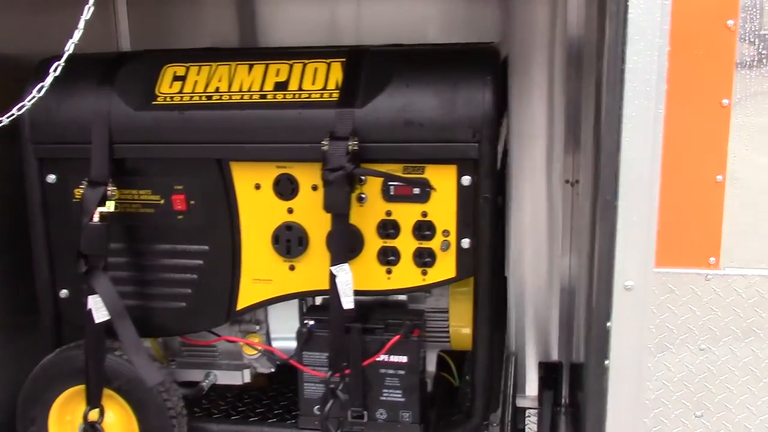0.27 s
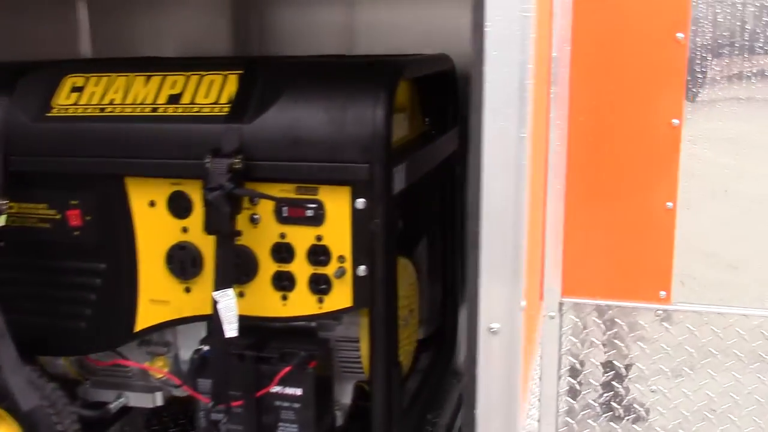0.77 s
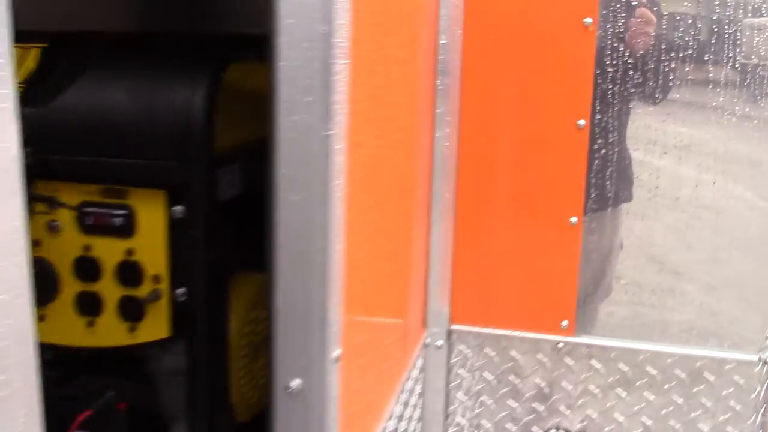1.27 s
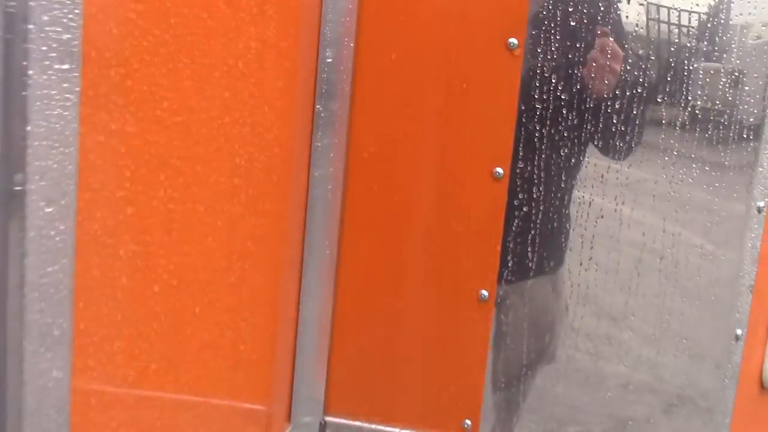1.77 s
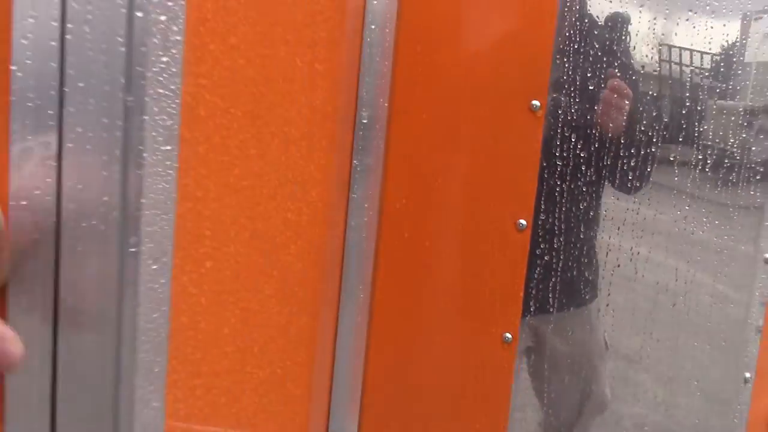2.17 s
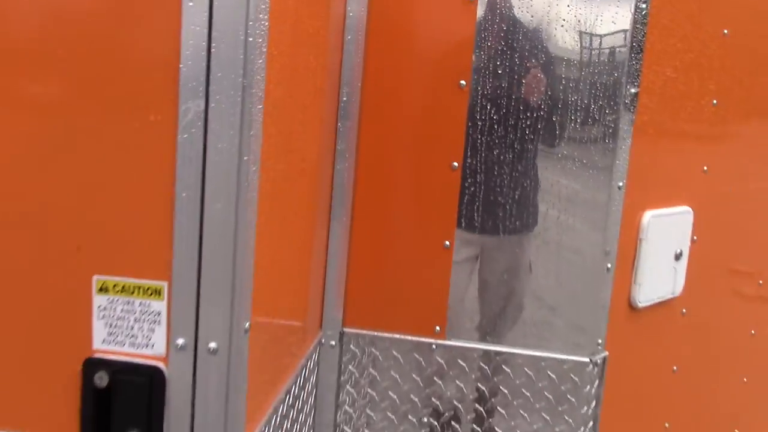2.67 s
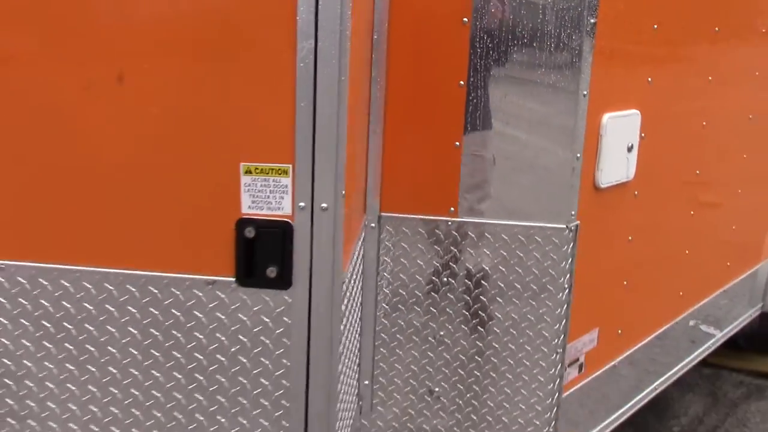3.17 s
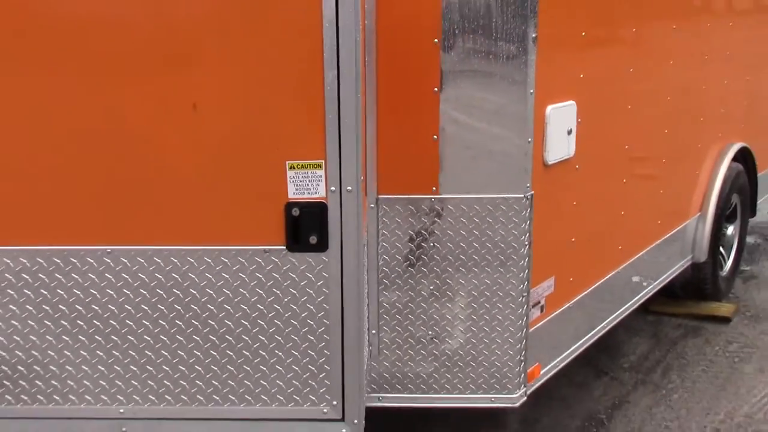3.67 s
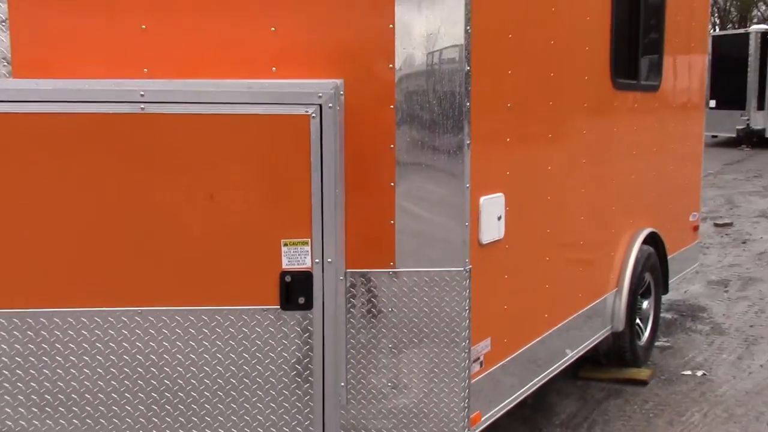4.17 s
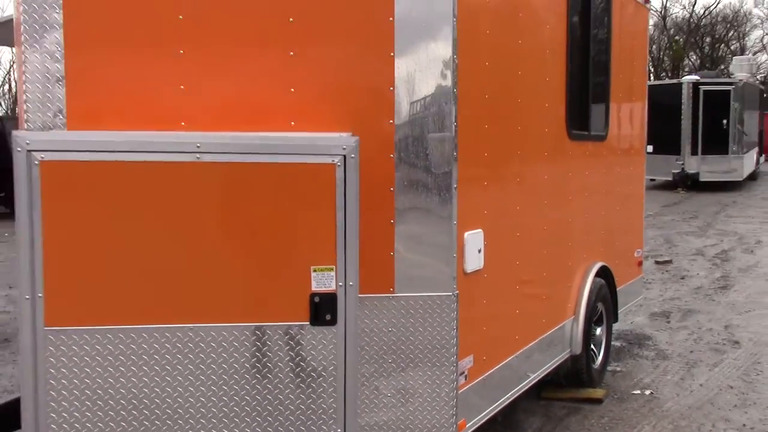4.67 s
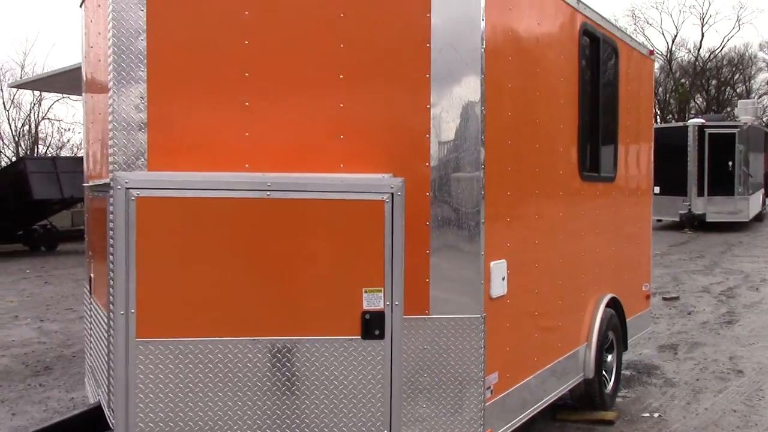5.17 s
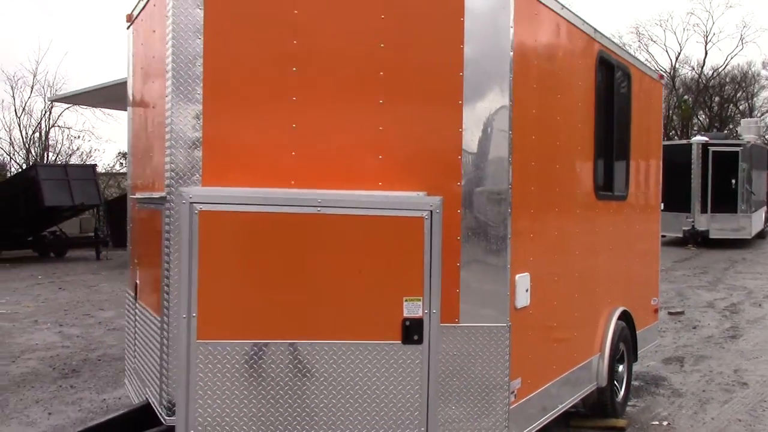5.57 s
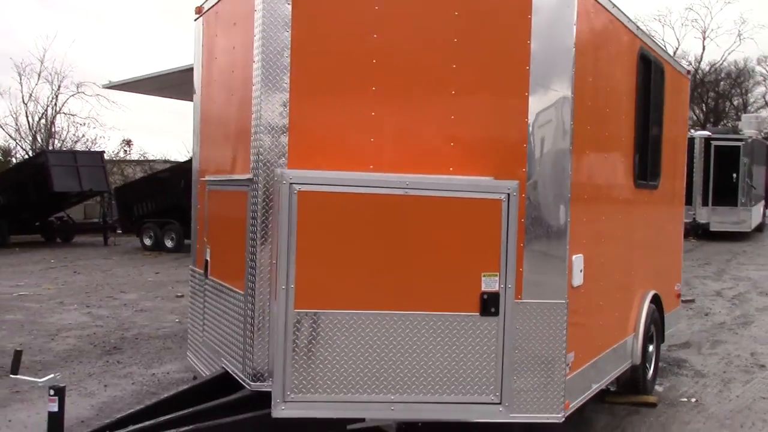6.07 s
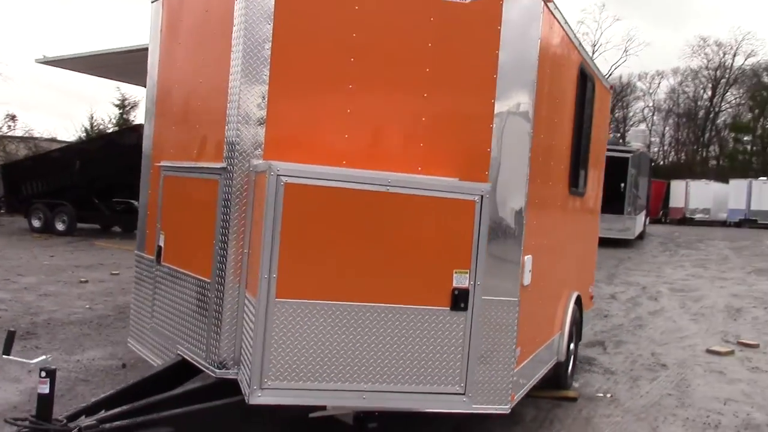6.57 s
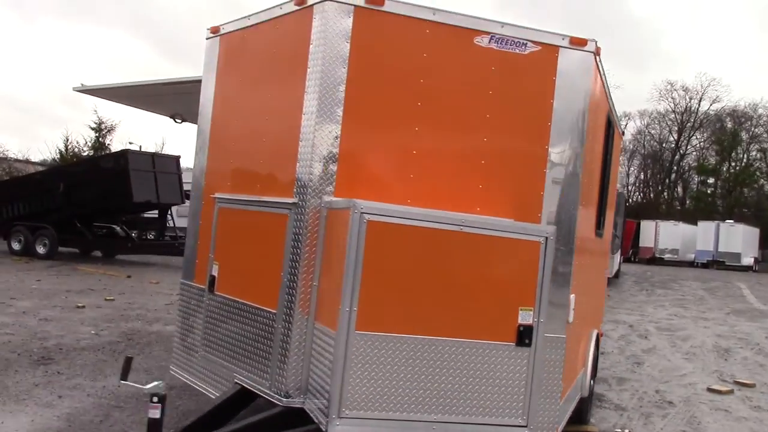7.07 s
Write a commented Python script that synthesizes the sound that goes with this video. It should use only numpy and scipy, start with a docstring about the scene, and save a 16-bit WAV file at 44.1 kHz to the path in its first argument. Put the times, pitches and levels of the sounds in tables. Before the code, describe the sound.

Small metallic clicks and gritty scuffs, then a sheet-metal door bangs shut with a boom and latch snap, and wind rumble swells outdoors.

```python
"""Slamming a sheet-metal door in a wet gravel yard

A trailer's compartment door bangs shut outdoors: struck modes ring, the panel booms, the latch snaps.
Hardware clicks and scrapes, shoes scuff over grit and something squeals faintly far off: filtered noise
bursts and wavering tones. Distant traffic is coloured noise; wind is turbulent noise that surges just after
the slam, eases, then builds to the end.
The bang turns the microphone's automatic gain down, and it stays down. Table levels precede that gain."""
import sys
import numpy as np
from scipy import signal
from scipy.fft import rfft, irfft, next_fast_len
from scipy.io import wavfile
from scipy.ndimage import uniform_filter1d

SR = 44100
rng = np.random.default_rng(int(sys.argv[2]) if len(sys.argv) > 2 else 0)


def master(y):
    """Save y as 16-bit WAV."""
    cut = np.clip(np.atleast_2d(y).T, -1, 1)
    pcm = np.round(cut * 32767)  # scale
    wavfile.write(sys.argv[1], SR, pcm.astype(np.int16))


N = 323253
T = np.arange(N) / SR  # time in seconds


def undb(db):
    """Decibel law: 20 dB is a tenfold amplitude ratio."""
    return 10 ** (np.asarray(db) / 20)


def unit(x):
    """Normalisation: scale to rms 1."""
    return x / np.sqrt(np.mean(x ** 2) + 1e-18)


def curves(rows):
    """Linear interpolation: join each column of a table by straight lines in time."""
    times, *columns = np.transpose(rows)
    return [np.interp(T, times, column) for column in columns]


def colour(x, points, tilt_db=0):
    """Spectral filtering: weight a sound by (Hz, dB) points and a tilt in dB per octave."""
    size = next_fast_len(len(x))
    octave = np.log2(np.maximum(np.fft.rfftfreq(size, 1 / SR), 1))
    hz, db = np.transpose(points)
    gain = undb(np.interp(octave, np.log2(hz), db) + tilt_db * octave)
    return irfft(rfft(x, size) * gain, size)[:len(x)]


def shape(x, points, tilt_db=0):
    """Spectral filtering followed by scaling to rms 1."""
    return unit(colour(x, points, tilt_db))


def band(x, hz, q):
    """Second-order resonance: pass one broad band; Q is held above 0.5."""
    b, a = signal.iirpeak(min(hz, SR / 3), max(q, .5 + 1e-3), fs=SR)
    return signal.lfilter(b, a, x)


def walk(rate):
    """Slow random modulation: about rate new levels per second, smoothly joined, rms 1."""
    k = max(int(SR / rate), 2)
    levels = rng.standard_normal(N // k + 2)
    joined = np.interp(np.arange(N) / k, np.arange(len(levels)), levels)
    return unit(uniform_filter1d(joined, k // 2))


def fade(t, t60):
    """Exponential decay: down 60 dB after t60 seconds."""
    return np.exp(-np.log(1000) * t / t60)


def add(out, s, x):
    """Superposition: mix x into out from time s on."""
    i = max(int(s * SR), 0)
    out[i:i + len(x)] += x[:len(out) - i]


# spectrum of distant traffic and air: frequency_hz, density_db (relative, per Hz)
YARD_SPECTRUM = [(30, 3.5), (120, 5), (200, 1.5), (350, -5), (600, -7), (850, -6), (1150, -9.5),
                 (1600, -12), (2500, -19), (4000, -24.5), (6000, -27.5), (7500, -32), (11000, -40),
                 (15500, -37)]
YARD_DB = -41


def yard(flicker_db=0.88, dip_s=1.6, dip_db=-11):
    """Diffuse noise: many distant sources blur into a wash that wavers and dips briefly just after the bang."""
    dip = dip_db * np.exp(-((T - dip_s) / .018) ** 2)
    wash = shape(rng.standard_normal(N), YARD_SPECTRUM)
    return wash * undb(YARD_DB + flicker_db * walk(5.3) + dip)


def eddies(points, even_s):
    """Turbulent pressure: coloured noise whose strength is even over spans longer than even_s."""
    x = shape(rng.standard_normal(N), points)
    return x / np.sqrt(uniform_filter1d(x ** 2, int(even_s * SR)) + 1e-9)


# spectra of wind rumble and of slow pressure swells: frequency_hz, density_db (relative, per Hz)
RUMBLE_SPECTRUM = [(12, -1), (22, 2.5), (42, -3), (60, -9.5), (105, -19.5), (140, -27), (250, -45.5),
                   (500, -58), (1200, -97)]
SWELL_SPECTRUM = [(2, -11), (6, 1), (11, 12), (17, -2.5), (28, -16), (60, -97)]
# the breeze surges just after the slam, eases, then builds to the end: time_s, rumble_db
BREEZE_LEVELS = [(0, -37.5), (1.3, -38.5), (1.9, -25.5), (2.5, -35.5), (3.2, -30.5), (3.9, -33.5),
                 (4.9, -32), (5.7, -26), (6.6, -19), (7.33, -11)]
# gusts and lulls on top of it: middle_s, half_length_s, change_db
GUST_CHANGES = [(.4, 0.35, 6), (2.274, .05, 7), (4.52, 0.029, 8), (4.69, 0.055, 4), (5.14, 0.18, 12),
                (5.343, 0.046, -7), (5.965, 0.06, 10.5), (6.326, 0.03, 1.5), (6.853, 0.035, 4),
                (6.943, 0.033, 0)]
# swell level under a full-scale rumble in dB, and dB of swell per dB of rumble
SWELL_DB, SWELL_FOLLOW = -3.5, 0.67


def wind(flutter_db=1.5, ceiling=.85):
    """Turbulence at the microphone: gusts rumble over slow swells; soft saturation flattens the strongest."""
    rumble_db = curves(BREEZE_LEVELS)[0]
    for s, half_s, db in GUST_CHANGES:
        rumble_db = rumble_db + db * np.exp(-((T - s) / half_s) ** 2)
    swell_db = SWELL_DB + SWELL_FOLLOW * rumble_db
    rumble = eddies(RUMBLE_SPECTRUM, 0.139) * undb(rumble_db + flutter_db * walk(22))
    swell = eddies(SWELL_SPECTRUM, 0.27) * undb(swell_db)
    return ceiling * np.tanh((rumble + swell) / ceiling)


# grit under a sole: frequency_hz, density_db (relative, per Hz)
GRIT_SPECTRUM = [(200, 26.5), (1000, 10.5), (2500, 6), (6000, 0.5), (7200, -2.5), (11500, -10.5),
                 (13000, -9), (16000, -30)]
# footsteps on wet grit: middle_s, half_length_s, level_db
FOOTSTEPS = [(0.185, 0.072, -49), (0.457, 0.18, -56), (1.38, 0.37, -53.5), (2.16, 0.081, -45),
             (2.429, 0.24, -54), (3.092, 0.05, -46), (3.862, 0.12, -49), (4.501, 0.15, -53),
             (5.072, 0.15, -53), (6.644, 0.053, -53), (7.141, 0.11, -54.5)]
# brief hard scrapes: middle_s, level_db, centre_hz
HARD_SCRAPES = [(0.129, -45, 9300), (.943, -33.5, 3600), (1.003, -37.5, 2500), (1.06, -37.5, 3900),
                (1.139, -34.5, 2100), (1.215, -46, 4400), (1.52, -41, 1460), (1.729, -43, 2500),
                (3.203, -36.5, 2200), (3.31, -35.5, 2960)]
STEP_HZ, SCRAPE_HALF_S = 4900, 0.018


def scuffs(q=.501, grain_db=5, lean=0.13):
    """Sliding friction: a swell of tiny cracks of unequal size that rises faster than it fades."""
    out, t = np.zeros(N), T[:SR // 2]
    steps = [(*row, STEP_HZ) for row in FOOTSTEPS]
    scrapes = [(s, SCRAPE_HALF_S, db, hz) for s, db, hz in HARD_SCRAPES]
    for s, half_s, level_db, hz in steps + scrapes:
        grit = 0
        for _ in range(3):  # three sets of stones crack independently
            sizes = undb(grain_db * np.minimum(rng.exponential(size=len(t)), 4))
            grains = sizes[np.arange(len(t)) // 48]  # one size per 48 samples
            grit = grit + unit(band(grains * rng.standard_normal(len(t)), hz, q))
        start = max(s - t[-1] / 2, 0)
        age = t + start - s
        width_s = half_s * (1 + lean * np.sign(age))
        swell = np.exp(-(age / width_s) ** 2)
        add(out, start, undb(level_db) * shape(grit, GRIT_SPECTRUM) * swell)
    return out


# something loose rattles on after the slam
RATTLE_S, RATTLE_GAP_S, RATTLE_JITTER_S = 1.912, .033, .006
RATTLE_DB, RATTLE_FALL_DB = -39.5, 1.5  # first tick, and fall per tick
RATTLE_HZ, RATTLE_Q, RATTLE_T60_S = 6000, 1.4, .06


def rattle(count=5):
    """Repeated impact losing energy: unevenly spaced ticks, each weaker, as rows of clicks."""
    rows = []
    for k, late in enumerate(rng.standard_normal(count)):
        start_s = RATTLE_S + k * RATTLE_GAP_S + RATTLE_JITTER_S * late
        rows.append((start_s, RATTLE_DB - k * RATTLE_FALL_DB, RATTLE_HZ, RATTLE_Q, RATTLE_T60_S))
    return rows


# sharp clicks of hardware and stones: start_s, level_db, centre_hz, resonance_q (each of two passes), t60_s
SHARP_CLICKS = [(.4775, -36.5, 3200, 1.16, 0.075), (.6465, -44.5, 3500, 0.68, 0.031),
                (.6996, -32, 5300, 1, .045), (.7234, -38, 5200, .9, 0.042), (.732, -35, 4530, 0.63, 0.041),
                (.8445, -39, 6130, 1, 0.036), (.9319, -33, 4580, 1.15, 0.088),
                (.9505, -28, 4100, 2.6, .024), (1.05, -45, 4000, 0.4, .05), (1.1318, -28, 2170, 3.8, 0.021),
                (2.363, -45, 4470, 1.2, .07), (2.535, -34.5, 3560, 0.97, 0.053),
                (3.2015, -32, 1900, 2.2, 0.054), (3.211, -37.5, 4440, 4.9, 0.026),
                (3.3024, -35.5, 6600, 0.75, .11), (3.404, -40, 9900, 1.4, 0.026),
                (3.523, -41.5, 6850, 1.3, 0.016), (3.915, -42.5, 4350, 1.3, .1),
                (4.5696, -42, 4500, 1, .049), (5.924, -42.5, 4200, 1.3, 0.029),
                (5.941, -37.5, 3420, 1.5, 0.023), (7.07, -42, 7300, .8, 0.11),
                (7.0975, -35, 8100, 1.3, 0.027), (7.1452, -41, 5100, 1.3, 0.079)]
# dull knocks of heels and handling: start_s, level_db, centre_hz, resonance_q (each of two passes)
DULL_KNOCKS = [(.648, -34.5, 613, 0.82), (.7278, -28.5, 560, 1.4), (3.005, -31, 332, 1.6),
               (3.31, -32, 450, 1.1), (4.384, -34, 333, 1.4), (5.9188, -20.5, 126, 4.2)]
KNOCK_T60_S = 0.044


def clicks(tail_db=-24, tail_t60=0.48):
    """Damped resonance: small contacts, bright or dull, each die fast in one band over a faint tail."""
    out, t = np.zeros(N), T[:SR // 4]
    knocks = [(*row, KNOCK_T60_S) for row in DULL_KNOCKS]
    for s, level_db, hz, q, t60 in list(SHARP_CLICKS) + knocks + rattle():
        body = band(band(rng.standard_normal(len(t)), hz, q), hz, q)
        decay = fade(t, t60) + undb(tail_db) * fade(t, tail_t60)
        # level_db is the strength at the onset, whatever the decay
        add(out, s, undb(level_db) * unit(body * decay) * np.sqrt(np.mean(decay ** 2)))
    return out


# puffs of air as the door closes and springs back: middle_s, peak_db
AIR_PUFFS = [(1.55, -18), (1.699, -8.5)]
PUFF_S = 0.014  # from the middle of a puff to its crest


def puffs():
    """Air displacement: the moving door shoves air at the microphone, a push and then a suck."""
    out = np.zeros(N)
    for s, peak_db in AIR_PUFFS:
        age = (T - s) / PUFF_S
        out -= undb(peak_db) * age * np.exp((1 - age ** 2) / 2)  # crests at 1
    return out


# blows on the door frame and latch: start_s, level_db, ringing_db (relative to the crack),
# tilt_db (per octave, of the crack), crack_t60_s
FRAME_BLOWS = [(1.5489, -7, -14.5, -0.8, 0.043), (1.6205, -31, -10, -8, .03),
               (1.6274, -23.5, -20, -2.5, 0.05), (1.7438, -22, -14, -3, 0.025),
               (1.7696, -21.5, -1, 3, 0.048), (1.7895, -33, -16, -0.5, 0.12),
               (1.821, -5.5, -1.5, 2.5, 0.029), (1.8335, -20, 0, 1.5, 0.071)]
# modes of frame and latch: frequency_hz, level_db (relative), t60_s
FRAME_RESONANCES = [(425, -20, .2), (641, -17, .12), (832, 0, .085), (913, -2, .05), (959, -2, .055),
                    (1105, -5, .05), (1230, 1, .065), (1305, -5, .06), (1445, -3, .055), (1505, -7, .09),
                    (1631, -4, .085), (1789, -2, .08), (1908, -10, .07), (2065, -4, .05), (2143, -4, .075),
                    (2305, -9, .07), (2610, -14, .06), (3035, -17, .11), (3620, -21, .08), (4130, -12, .06),
                    (4380, -9, .06), (4760, -13, .08), (5110, -16, .08), (5630, -12, .065),
                    (5980, -16, .09), (6944, -17, .06), (8333, -20, .05)]
# crack of metal on metal: frequency_hz, density_db (relative, per Hz)
CRACK_SPECTRUM = [(120, -10), (350, 3.5), (650, -4), (900, -2.5), (2100, -4.5), (2800, -8.5), (4400, -11),
                  (5700, -15), (7000, -13), (8700, -15), (10500, -27), (12500, -30), (16000, -47)]


def frame(tail_db=-27, tail_t60=0.35, rise_s=0.000076, ring_tilt=.1):
    """Modal impact: metal meets metal in a short crack, ringing modes and a thin tail from the trailer's skin."""
    out, t = np.zeros(N), T[:SR // 2]
    hz, db, t60 = np.transpose(FRAME_RESONANCES)[:, :, None]
    for s, level_db, ring_db, tilt_db, crack_t60 in FRAME_BLOWS:
        decay = fade(t, crack_t60) + undb(tail_db) * fade(t, tail_t60)
        crack = shape(rng.standard_normal(len(t)), CRACK_SPECTRUM, tilt_db) * decay
        # the modes take only a share, ring_tilt, of the crack's tilt
        weight = undb(db + ring_tilt * tilt_db * np.log2(hz))
        # each blow lands on another spot, so the modes start out of step
        modes = weight * fade(t, t60) * np.sin(2 * np.pi * (hz * t + rng.random(hz.shape)))
        ring = modes.sum(axis=0) / np.sqrt(np.sum(weight ** 2) / 2)
        onset = 1 - np.exp(-t / rise_s)
        add(out, s, undb(level_db) * (crack + undb(ring_db) * ring) * onset)
    return out


# the door lands on its seal, bounces and is pressed home: start_s, level_db, contact_s
SEAL_THUMPS = [(1.55, -11.5, 0.0022), (1.562, -2, 0.0083), (1.589, -10.5, 0.0034), (1.614, -5.5, 0.00554),
               (1.629, -12, 0.0015), (1.745, -19.5, 0.003), (1.792, -21.5, .0009), (1.839, -17, 0.0021)]
# modes of the panel and the compartment behind it: frequency_hz, level_db (relative), t60_s
PANEL_RESONANCES = [(37.9, -2, 0.24), (60.8, -5, 0.29), (93.4, -1.5, 0.137), (111, -7, 0.12),
                    (123.6, -9, 0.2), (171.6, -2.5, 0.142), (217, -15.5, 0.13), (270, -9, 0.21),
                    (346, -1, 0.086), (391, -1, 0.077), (454, -25, 0.076), (500, -10.5, 0.107),
                    (583, -14, .06), (706, -9, .05)]


def panel(rattle_db=-19, rattle_hz=400, rattle_t60=0.083):
    """Contact-time filtering: the door bounces on its seal and booms; longer pushes reach only the low modes."""
    out, t = np.zeros(N), T[:SR // 2]
    ring = np.zeros(len(t))
    for hz, db, t60 in PANEL_RESONANCES:
        ring += undb(db) * fade(t, t60) * np.sin(2 * np.pi * hz * t)
    for s, level_db, contact_s in SEAL_THUMPS:
        contact = np.minimum(t / contact_s, 1)
        push = np.sin(np.pi * contact)
        boom = signal.fftconvolve(ring, push / push.sum())[:len(t)]
        # the thin skin shudders in many crowded higher modes
        shudder = band(band(rng.standard_normal(len(t)), rattle_hz, 1), rattle_hz, 1)
        shudder = unit(shudder) * fade(t, rattle_t60) * contact
        add(out, s, undb(level_db) * (boom + undb(rattle_db) * shudder))
    return out


# faint far squeals, one list of rows each: time_s, pitch_hz, level_db
FAR_SQUEALS = [
    [(4.13, 1600, -56), (4.22, 1596, -55.5), (4.31, 1516, -54)],
    [(4.65, 1730, -52), (4.88, 1735, -57), (4.98, 1810, -53), (5.08, 1680, -74), (5.22, 1750, -51)],
    [(5.2, 1965, -55), (5.35, 1930, -57.5), (5.8, 1930, -67)],
]


def squeals(waver=0.0035, edge_s=0.034, fading_db=3.5):
    """Frequency modulation: thin wavering tones from far away, perhaps brakes, fade in and out irregularly."""
    out, wobble = np.zeros(N), 1 + waver * walk(45)
    for rows in FAR_SQUEALS:
        hz, db = curves(rows)
        first_s, last_s = rows[0][0], rows[-1][0]
        gate = np.clip(np.minimum(T - first_s, last_s - T) / edge_s, 0, 1)
        tone = np.sin(2 * np.pi * np.cumsum(hz * wobble) / SR)
        out += gate * undb(db + fading_db * walk(25.5)) * tone
    return out


def scene():
    """Superposition: everything reaches one microphone, the same in both ears."""
    mono = yard() + wind() + scuffs() + clicks() + puffs() + frame() + panel() + squeals()
    return np.array([mono, mono])


# the microphone's treble response: frequency_hz, gain_db
MICROPHONE_RESPONSE = [(1000, 1.5), (3000, -1), (5600, 0.5), (7000, -4), (8500, -5), (10500, -1),
                       (12000, -2.5), (15000, -8.5)]
TOP_HZ = 15700  # upper band limit


def record(dry, boost_db=11, hiss_db=-84):
    """Peak-held automatic gain: overloading peaks pull it down and it holds; at its minimum, overloads clip."""
    heard = np.array([colour(channel, MICROPHONE_RESPONSE) for channel in dry])
    heard = heard + undb(hiss_db) * rng.standard_normal(dry.shape)  # each channel has its own faint hiss
    held = np.maximum.accumulate(np.abs(heard).max(axis=0))
    gain = np.clip(1 / held, 1, undb(boost_db))
    lowpass = signal.ellip(10, .2, 80, TOP_HZ, fs=SR, output="sos")
    return signal.sosfilt(lowpass, np.clip(gain * heard, -1, 1))


dry = scene()
out = record(dry)
master(out)
```